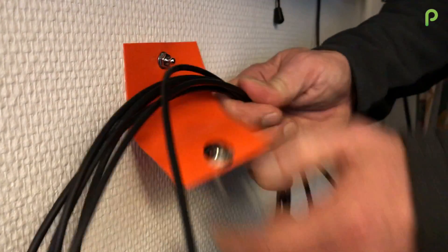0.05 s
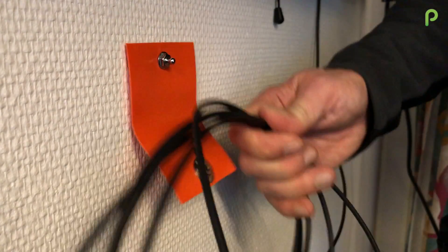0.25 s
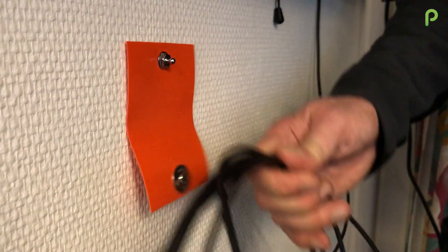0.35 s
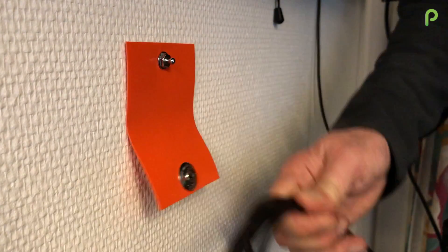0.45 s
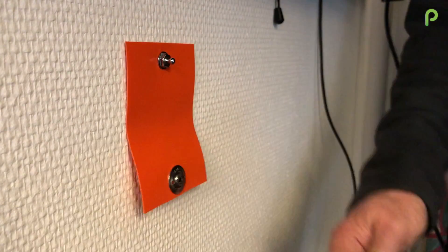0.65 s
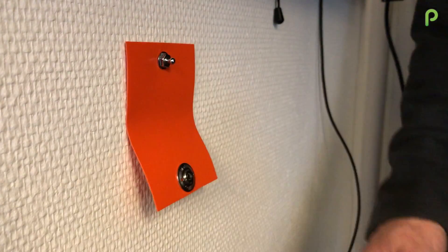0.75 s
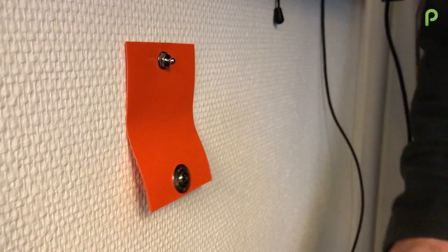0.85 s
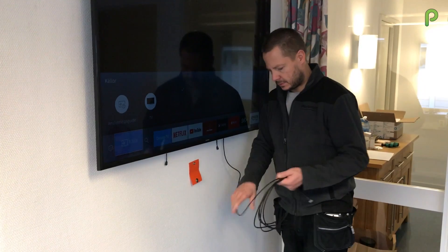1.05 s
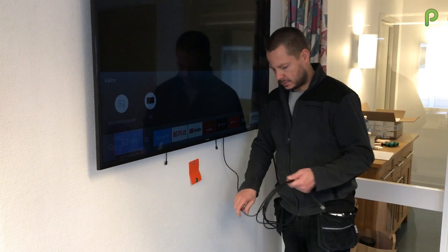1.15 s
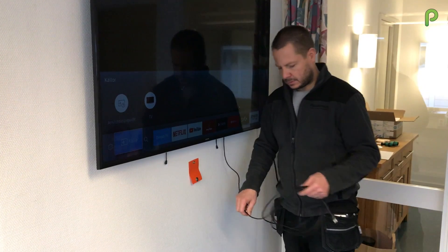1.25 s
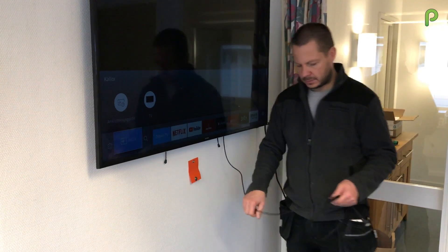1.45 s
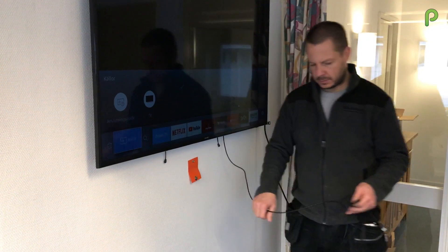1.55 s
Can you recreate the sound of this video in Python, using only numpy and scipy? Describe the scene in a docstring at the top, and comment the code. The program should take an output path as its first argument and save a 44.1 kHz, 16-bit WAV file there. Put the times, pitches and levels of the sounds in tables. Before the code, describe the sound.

Close by in a small room, a snap fastener is pulled open with a sharp pop that jolts a hollow wall. Two softer knocks follow, with the faint hiss and pats of cables being handled over a low rumble.

```python
"""A metal snap fastener, on a strap screwed to a hollow wall, is pulled open in a small room. It ticks under
the strain, then pops: the impulse excites the normal modes of its cap, of the wall and of the room. The freed
strap swings back and knocks twice on the wall, and the room reverberates after each impact. A bundle of cables
slides out with a friction hiss and is handled, with soft pats and sleeve rustle, over a low room rumble."""
import sys
import numpy as np
from scipy import signal
from scipy.io import wavfile

SR = 44100
rng = np.random.default_rng(int(sys.argv[2]) if len(sys.argv) > 2 else 0)


def to_wav(sig):
    """Store sig (one row per channel, or 1-D mono) as 16-bit WAV at the path in sys.argv[1].

    Samples outside -1..1 are clipped; the rate is SR.
    """
    pcm = np.clip(np.atleast_2d(sig), -1, 1) * 32767
    pcm = np.round(pcm).astype(np.int16)
    wavfile.write(sys.argv[1], SR, pcm.T)  # frames by channels


N = 70560
TIME = np.arange(N) / SR
TOP_HZ = 15800   # upper limit of the cap's crack and of the microphone


# Slips of the strained fastener. Each row: start in seconds, gain in dB, lower and upper band edge
# in Hz, decay time T60 in seconds.
STRAIN_TICKS = [(0.0581, -43, 1020, 8700, 0.008), (0.2088, -41, 6840, 14470, 0.014)]
def fastener():
    """Release of elastic energy: small slips tick, then the pop rings the cap and jolts the wall."""
    pop_s = 0.2337
    ticks = sum(crack(*row) for row in STRAIN_TICKS)
    return ticks + cap(pop_s, db=2.5) + wall(pop_s, db=-0.5, contact_hz=2680)


# Modes of the metal cap. Each row: frequency in Hz, relative level in dB, T60 in seconds.
METAL_CAP_MODES = [(2255, -48, 0.048), (2656, -42, 0.017), (3200, -42.5, 0.03), (3550, -43.5, 0.05),
                   (3927, -33, .012), (4050, -29, 0.0085), (4330, -37.5, 0.016), (5420, -58, .015),
                   (6950, -47, 0.02), (8720, -49, .012), (14400, -42, .008)]
def cap(start_s, db):
    """Free vibration: the cap slips over its stud with a crack and rings in damped normal modes."""
    rise = ramp(start_s, rise_s=0.00044)
    modes = sum(from_db(mode_db) * ring(start_s, hz, t60) for hz, mode_db, t60 in METAL_CAP_MODES)
    slip = crack(start_s, db=-43.5, low_hz=2900, high_hz=TOP_HZ, t60=0.028)
    return from_db(db) * rise * (modes + slip)


# Modes rung by each impact on the wall: the panel's own, while the slow low ones up to about 420 Hz belong to
# the room. Each row: frequency in Hz, relative level in dB, T60 in seconds.
WALL_AND_ROOM_MODES = [(60, -53, 0.37), (124.1, -31, 0.19), (169.1, -39.5, 0.39), (213.3, -45, 0.35),
                       (301.8, -42.5, 0.19), (361, -40, 0.017), (418.6, -47.5, 0.31), (488.5, -38, 0.068),
                       (737, -45, 0.15), (878, -19.5, 0.0093), (962, -17, 0.012), (1090, -29.5, 0.017),
                       (1201, -26, 0.023), (1774, -40.5, 0.036), (2055, -46, 0.057)]
def wall(start_s, db, contact_hz):
    """Dispersion of bending waves: low modes arrive later. A soft contact cuts the high ones."""
    modes = 0
    for hz, mode_db, t60 in WALL_AND_ROOM_MODES:
        delay_s = 0.000806 * (1000 / hz) ** 0.8
        modes = modes + from_db(mode_db) * ring(start_s + delay_s, hz, t60)
    return -from_db(db) * butter(modes, contact_hz, "low", order=6)


# Knocks of the strap. Each row: start in seconds, wall gain in dB, contact cutoff in Hz, clink gain in dB.
STRAP_KNOCKS = [(0.4837, -13.5, 1000, -44), (0.7462, -24.5, 1000, -56)]
def strap():
    """Impact excitation: the loose end swings against the wall, and the cap on it clinks faintly."""
    out = 0
    for start_s, wall_db, contact_hz, clink_db in STRAP_KNOCKS:
        clink = crack(start_s, clink_db, low_hz=1340, high_hz=4870, t60=0.03)
        out = out + wall(start_s, wall_db, contact_hz) + clink
    return out


# Loudness of the sliding cables. Each row: time in seconds, level in dB.
SLIDE_LEVEL = [(0, -69), (.09, -67.5), (.2, -65.5), (.3, -62), (.43, -60), (.55, -63), (.64, -69),
               (.72, -74), (.9, -71.5), (1.15, -89.5)]
# Spectrum of their hiss. Each row: frequency in Hz, relative spectral density in dB.
SLIDE_COLOUR = [(300, 0.5), (750, -16), (1050, 2.5), (1300, 1.5), (1750, -1), (2200, -5.5), (3000, 0),
                (3500, -5.5), (4100, -3), (4900, -13.5), (5900, -6.5), (7500, -14.5), (9000, -11),
                (10500, -16.5), (13000, -13), (16000, -22)]
def cable_slide():
    """Sliding friction: the bundle hisses as it rubs through the strap."""
    return level(SLIDE_LEVEL) * friction(SLIDE_COLOUR)


# Pats of the cable loops. Each row: start in seconds, note level in dB, pitch in Hz, scuff level in dB.
LOOP_PATS = [(0.892, -52, 700, -68.5), (0.927, -55.5, 760, -73), (0.961, -53.5, 677, -68),
             (0.989, -50.5, 580, -75), (1.207, -78, 1010, -71.5), (1.326, -59, 870, -60)]
def cable_pats():
    """Heavily damped collisions: loops meet softly, each with a dull note and a scuff of noise."""
    out = 0
    for start_s, note_db, hz, scuff_db in LOOP_PATS:
        note = from_db(note_db) * ring(start_s, hz, t60=0.033)
        scuff = from_db(scuff_db) * decay(start_s, t60=0.14) * noise_band(hz, edge_ratio=1.68)
        out = out + ramp(start_s, rise_s=0.0066) * (note + scuff)
    return out


# Brushes of the sleeve. Each row: peak time in seconds, Gaussian width in seconds, peak level in dB.
SLEEVE_BRUSHES = [(.88, 0.11, -86.5), (1.058, 0.058, -67), (1.6, 0.05, -72)]
# Spectrum of rubbing cloth. Each row: frequency in Hz, relative spectral density in dB.
CLOTH_COLOUR = [(400, -1), (1200, 2), (2000, -4.5), (2800, 2), (3400, -1), (4000, 2.5), (4800, -3.5),
                (5800, -1), (8000, -13.5), (16000, -16)]
def sleeve():
    """Friction of cloth: the rustle swells and fades as the arms move."""
    swell = sum(from_db(db) * np.exp(-0.5 * ((TIME - peak_s) / width_s) ** 2)
                for peak_s, width_s, db in SLEEVE_BRUSHES)
    return swell * friction(CLOTH_COLOUR)


# Strength of the reflections. Each row: frequency in Hz, gain in dB.
REVERB_GAIN = [(100, -36), (200, -4.5), (400, -9), (580, -15), (760, -13.5), (1000, -17), (1300, -13),
               (2500, -12.5), (4000, -18.5), (8000, -23), (16000, -25)]
# Reverberation time. Each row: frequency in Hz, T60 in seconds.
REVERB_T60 = [(100, 0.57), (800, 0.3), (4000, 0.088), (16000, 0.12)]
def room(x):
    """Reverberation: diffuse reflections follow a short gap and die faster in the treble."""
    gap_s = 0.0071
    response = 0
    for hz, band in bands(rng.standard_normal((2, N))):
        tail = decay(gap_s, at_hz(REVERB_T60, hz))
        response = response + from_db(at_hz(REVERB_GAIN, hz)) * band * tail / np.linalg.norm(tail)
    return signal.fftconvolve(x, response)[:N]


# Resonances of the deep rumble. Each row: frequency in Hz, relative level in dB, T60 in seconds.
DEEP_MODES = [(52.3, -4, 1), (69.9, -5.5, 0.23)]
# Loudness of the rumble during the movement. Each row: time in seconds, level in dB.
RUMBLE_LEVEL = [(0, -57.5), (.15, -65.5), (.3, -55.5), (.46, -62), (.58, -65), (.64, -55), (.72, -53.5),
                (.8, -64), (.92, -62.5), (1.05, -66), (1.3, -69.5), (1.55, -66)]
def rumble():
    """Forced resonance: noise drives two deep modes, and their level rises and falls."""
    response = sum(from_db(db) * rms_one(ring(0, hz, t60)) for hz, db, t60 in DEEP_MODES)
    driven = signal.fftconvolve(rng.standard_normal(2 * N - 1), response, "valid")
    return level(RUMBLE_LEVEL) * rms_one(butter(driven, 38, "high", order=4))


# Loudness of the low murmur. Each row: time in seconds, level in dB.
MURMUR_LEVEL = [(0, -66.5), (.2, -65.5), (.55, -62.5), (.7, -67.5), (.84, -65.5), (.97, -63), (1.08, -83),
                (1.6, -91)]
def murmur():
    """Amplitude-modulated narrow-band noise: the soft, low sound of movement."""
    return level(MURMUR_LEVEL) * noise_band(136.6, edge_ratio=1.255)


# Spectrum of the steady room noise. Each row: frequency in Hz, relative spectral density in dB.
AMBIENT_COLOUR = [(25, -14), (60, -1), (100, -10), (150, -3), (200, -5), (300, -10), (600, -19),
                  (1300, -26), (2000, -29.5), (3000, -28), (4000, -30), (5000, -33), (7500, -36.5),
                  (9000, -34.5), (10500, -40), (13000, -33), (16000, -37)]
def ambient_noise():
    """Stationary broadband noise, strongest in the bass."""
    return from_db(-66) * coloured(rng.standard_normal((2, N)), AMBIENT_COLOUR)


def crack(start_s, db, low_hz, high_hz, t60):
    """Transient of a sudden slip: a decaying, band-limited burst of noise."""
    burst = rng.standard_normal(N) * decay(start_s, t60)
    return from_db(db) * butter(burst, [low_hz, high_hz], "band", order=3)


def friction(spectrum, grains_per_s=900, grain_db=-5):
    """Stick-slip friction: tiny random impulses within a smooth rubbing hiss."""
    grains = rng.standard_normal((2, N)) * (rng.random((2, N)) < grains_per_s / SR)
    hiss = rng.standard_normal((2, N))
    return coloured(hiss + from_db(grain_db) * rms_one(grains), spectrum)


def ring(start_s, hz, t60):
    """Impulse response of one mode: a damped sinusoid."""
    return decay(start_s, t60) * np.sin(2 * np.pi * hz * (TIME - start_s))


def decay(start_s, t60):
    """Exponential decay from a sudden start, 60 dB in t60 seconds."""
    age = TIME - start_s
    return (age >= 0) * from_db(-60 * np.maximum(age, 0) / t60)


def ramp(start_s, rise_s):
    """Linear attack from 0 to 1."""
    return np.clip((TIME - start_s) / rise_s, 0, 1)


def noise_band(hz, edge_ratio):
    """Band-limited noise around hz, at unit rms."""
    return rms_one(butter(rng.standard_normal(N), [hz / edge_ratio, hz * edge_ratio], "band"))


def coloured(pair, spectrum):
    """Spectral shaping of a pair of noises into one, at unit rms."""
    return rms_one(sum(from_db(at_hz(spectrum, hz)) * band for hz, band in bands(pair)))


def bands(pair):
    """Filter bank giving (centre in Hz, band), fed alternately by two independent noises."""
    edges = np.concatenate([np.geomspace(22, 900, 13)[:-1], np.geomspace(900, 18000, 23)])
    return [(np.sqrt(low * high), butter(pair[k % 2], [low, high], "band"))
            for k, (low, high) in enumerate(zip(edges, edges[1:]))]


def butter(x, hz, kind, order=2):
    """Causal Butterworth filter."""
    return signal.sosfilt(signal.butter(order, hz, kind, fs=SR, output="sos"), x)


def level(rows):
    """Gain over time, interpolated in decibels."""
    return from_db(np.interp(TIME, *np.transpose(rows)))


def at_hz(rows, hz):
    """Interpolation on a log-frequency axis."""
    frequencies, values = np.transpose(rows)
    return np.interp(np.log(hz), np.log(frequencies), values)


def from_db(db):
    """Decibels to amplitude ratio."""
    return 10 ** (np.asarray(db) / 20)


def rms_one(x):
    """Normalisation to unit rms."""
    return x / np.sqrt(np.mean(x ** 2) + 1e-20)


def scene():
    """Superposition of the impacts, their reverberation, the handling noise and the background."""
    impacts = fastener() + strap()
    reflections = room(impacts)
    handling = cable_slide() + cable_pats() + sleeve()
    background = rumble() + murmur() + ambient_noise()
    return (impacts + reflections + handling + background)[None]


def record(dry):
    """Band limiting: the microphone loses the deepest bass, and the top is cut steeply."""
    thinned = butter(dry, 44.3, "high", order=3)
    return signal.sosfilt(signal.ellip(10, 0.1, 70, TOP_HZ, fs=SR, output="sos"), thinned)


dry = scene()
out = record(dry)
to_wav(out)
```